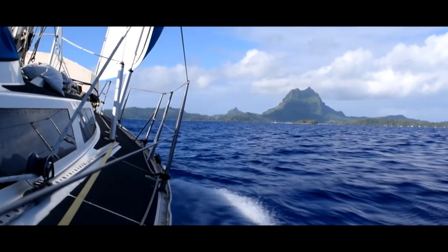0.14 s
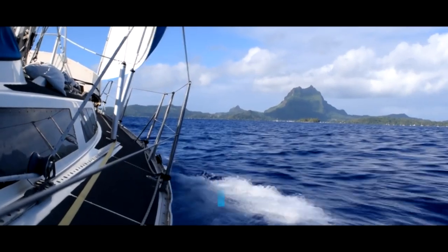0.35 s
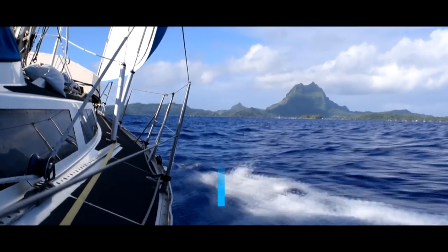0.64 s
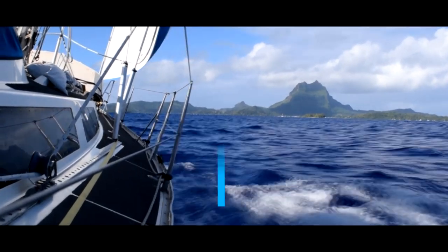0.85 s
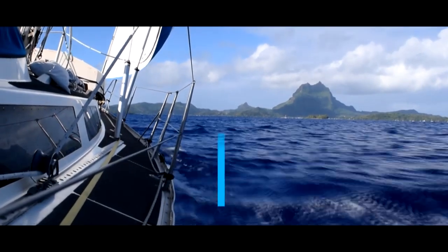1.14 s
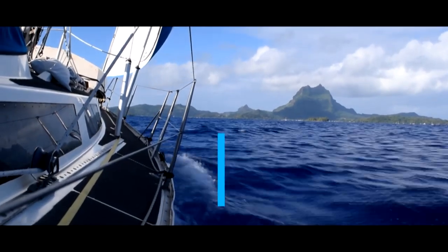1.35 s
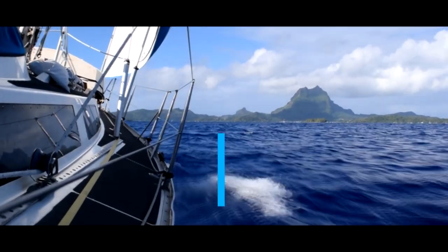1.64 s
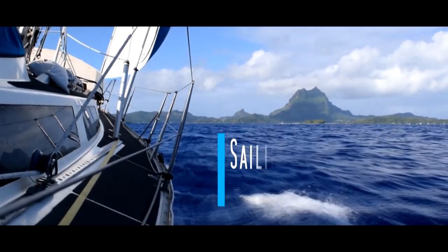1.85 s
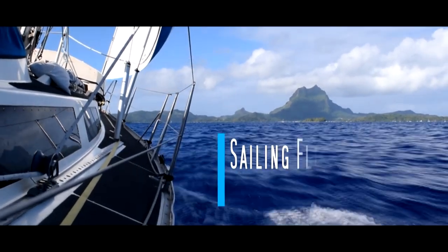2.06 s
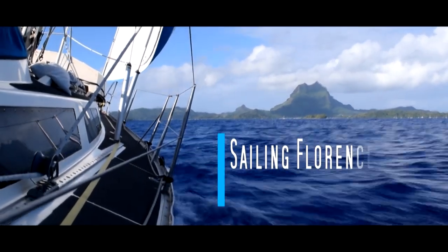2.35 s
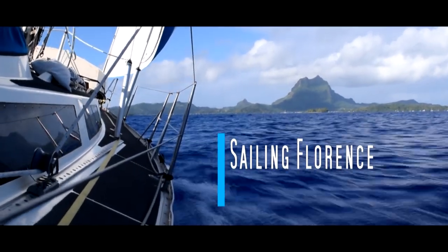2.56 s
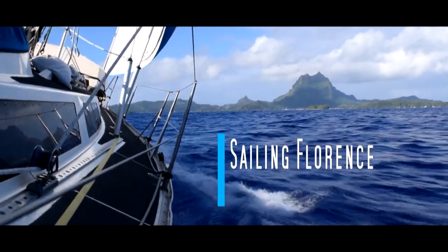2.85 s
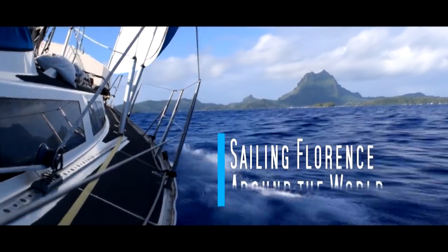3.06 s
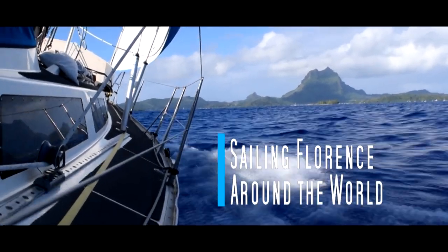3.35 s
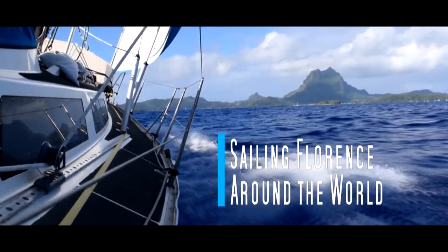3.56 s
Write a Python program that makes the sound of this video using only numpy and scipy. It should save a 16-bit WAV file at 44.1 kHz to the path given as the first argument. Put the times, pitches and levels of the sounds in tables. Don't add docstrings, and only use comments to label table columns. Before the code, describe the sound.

Bow waves break one after another beside a moving sailboat, foaming, hissing and bubbling over steady wake

```python
import sys
import numpy as np
from scipy import signal
from scipy.fft import rfft, irfft, next_fast_len
from scipy.io import wavfile
from scipy.ndimage import uniform_filter1d, map_coordinates

SR = 44100
rng = np.random.default_rng(int(sys.argv[2]) if len(sys.argv) > 2 else 0)


def gain_from_db(level_db):
    decades = np.asarray(level_db, float) / 20
    return 10 ** decades


def transcribe(signal):
    frames = np.atleast_2d(signal).T
    limited = np.clip(frames, -1, 1)
    pcm = np.round(limited * 32767).astype(np.int16)
    wavfile.write(sys.argv[1], SR, pcm)


N = 163170

# (time [s], level [dB])
WAVE_STRENGTH = [(0, -21.5), (.14, -16), (.36, -20), (.5, -23.5), (.7, -27), (.9, -29.5), (1.0, -35),
                 (1.3, -37), (1.38, -33), (1.5, -27), (1.68, -22), (1.8, -25.5), (1.95, -22.5),
                 (2.42, -25.5), (2.62, -30), (3.12, -30), (3.3, -28), (3.7, -24.5)]
# (frequency [Hz], density [dB per Hz])
CHURN_SPECTRUM = [(24, -73), (40, -56), (129, -10), (264, -5.5), (420, -0.5), (560, -2), (850, -3.5),
                  (1570, -5.5), (2060, -2.5), (6000, -34), (7800, -50), (13200, -120)]
# (time [s], level [dB])
SPRAY_THROWN = [(0.0, -40.5), (0.14, -30.5), (0.17, -33.5), (0.69, -44), (0.74, -41), (0.97, -52.5),
                (0.99, -52), (1.03, -54), (1.5, -49.5), (1.72, -44), (1.8, -49), (1.87, -44.5), (2.2, -45),
                (2.7, -53.5), (2.71, -51), (2.75, -50.5), (3.06, -51.5), (3.7, -46)]
# (frequency [Hz], density [dB per Hz])
SPRAY_SPECTRUM = [(1500, -15), (2800, 0), (4060, -2.5), (4930, -9), (6500, -10.5), (9130, -14),
                  (16200, -29.5)]
# (frequency [Hz], density [dB per Hz])
WAKE_SPECTRUM = [(20, -50), (60, -32), (150, -9), (350, -6.5), (700, -8.5), (3000, -4), (5000, -24),
                 (16200, -51)]
# (time [s], peak [dB], pitch [Hz], life [s])
POPS = [(1.965, -15, 2080, .009), (1.097, -27, 1000, .014), (3.14, -26, 1400, .016),
        (.893, -27, 1000, .014), (.578, -22, 820, .03), (.553, -22, 600, .022),
        (.712, -28, 820, .025), (.944, -19, 260, .007), (.93, -32, 130, .012),
        (.912, -24, 280, .007), (1.044, -28, 170, .012), (.002, -22, 4150, .007),
        (.028, -16, 380, .02), (.047, -16, 450, .012), (.066, -16, 680, .01), (.086, -15, 640, .016),
        (.092, -17, 2050, .01), (.128, -13, 680, .012), (.144, -11, 1150, .01),
        (.157, -14, 1300, .008), (.21, -13, 500, .014), (.31, -17, 1600, .008),
        (.34, -21, 2020, .01), (.963, -31, 200, .01), (1.0, -31, 150, .014), (1.173, -30, 345, .016),
        (1.201, -36, 684, .012), (1.218, -30, 1760, .01), (1.41, -29, 400, .014),
        (1.395, -28, 950, .02), (1.457, -24, 783, .014), (1.614, -20, 805, .016),
        (1.66, -21, 657, .016), (1.825, -22, 544, .016), (1.935, -22, 500, .016),
        (2.13, -24, 2100, .012), (2.728, -26, 2600, .006), (3.005, -29, 1100, .014),
        (3.325, -25, 850, .014), (3.315, -28, 1970, .014), (3.655, -26, 2200, .016)]
# (time [s], level [dB], decay by 60 dB [s], centre [Hz])
SPLASHES = [(.988, -26, .14, 2800), (.989, -39, .08, 4300), (.885, -35, .15, 2400), (2.716, -25, .25, 2200),
            (.005, -27, .05, 4200), (.115, -23, .5, 1250), (.305, -24, .5, 480), (.135, -24, .35, 2300),
            (.35, -27, .4, 480), (1.96, -30, .5, 2200), (.56, -33, .5, 2600), (1.875, -27, .2, 750),
            (2.005, -27, .3, 650), (2.325, -28, .15, 500), (2.94, -33, .3, 800), (3.29, -31, .3, 800),
            (3.63, -28, .5, 900), (.092, -24, .3, 2200), (.18, -21, .5, 800), (.43, -30, .2, 1700),
            (.482, -31, .15, 1900), (1.2, -39, .2, 700), (1.345, -36, .3, 950), (1.447, -34, .2, 2200),
            (1.56, -32, .3, 2050), (2.4, -32, .15, 1940), (2.8, -34, .2, 1100), (3.12, -35, .2, 2100),
            (3.22, -33, .2, 800), (3.43, -32, .4, 820), (3.54, -32, .3, 1800), (3.635, -31, .3, 2100)]
# (share of centre [ratio], density [dB per Hz])
SPLASH_SPECTRUM = [(.2, -35), (.55, 0.5), (1, 14), (1.6, -15), (3, -25), (5, -43)]
# (time [s], length [s], level [dB], depth of the low push [dB])
GUSTS = [(0.018, .05, -38, -1), (0.128, 0.052, -37, 0), (0.303, 0.3, -60, 15), (0.545, 0.039, -34.5, -3),
         (0.71, 0.21, -50.5, 10), (0.93, 0.085, -36, 1), (1.05, 0.05, -42, 9), (1.585, 0.23, -35, -16),
         (1.812, 0.039, -41, -12), (2.04, 0.17, -39.5, -11), (3.53, .12, -42.5, 8.5), (.42, .08, -51, 8),
         (1.16, .1, -61, 6), (2.903, 0.11, -56, 4), (3.2, .12, -60, 7)]
# (frequency [Hz], density [dB per Hz])
BUFFET_SPECTRUM = [(40, -42), (110, -5), (200, 4), (320, -9), (600, -36), (1200, -80)]
# (frequency [Hz], density [dB per Hz])
PUSH_SPECTRUM = [(15, -30), (40, -14), (90, 4), (140, -6), (300, -40)]
# (frequency [Hz], level [dB], decay by 60 dB [s])
FITTING_MODES = [(1000, -9, .015), (1980, -2, .022), (2550, -15, .04), (3400, -13, .012), (5250, -19, .016),
                 (7750, -21, .016)]
# (frequency [Hz], width [Hz], boost [dB])
HOUSING_RESONANCES = [(852, 97, 3), (1990, 680, -1), (278, 49, -4), (3100, 200, 0.5), (630, 25, 1.5)]


def unit(x):
    return x / np.sqrt(np.mean(x ** 2) + 1e-20)


def wobble(rate):
    knots = rng.standard_normal(int(N * rate / SR) + 4)
    return map_coordinates(knots, [np.arange(N) * rate / SR])


def filtered(x, response):
    size = next_fast_len(len(x) + 8192)
    spectrum = rfft(x, size) * response(np.fft.rfftfreq(size, 1 / SR))
    return irfft(spectrum, size)[:len(x)]


def coloured(x, points):
    f, db = np.transpose(points)

    def response(hz):
        return gain_from_db(np.interp(np.log(hz + 1), np.log(f + 1), db, left=-120, right=-120))

    return unit(filtered(x, response))


def patchy(depth_db):
    z = signal.stft(rng.standard_normal(N), nperseg=512)[2]
    field = uniform_filter1d(rng.standard_normal(z.shape), size=7, axis=0)
    field = uniform_filter1d(field, size=10, axis=1)
    return unit(signal.istft(z * gain_from_db(depth_db * unit(field)), nperseg=512)[1][:N])


def grains(count, hz, spread, cycles, size_db, rise, size):
    u, t = rng.random((count, 2)), np.arange(size) / SR
    f = np.clip(hz * np.exp(spread * rng.standard_normal((count, 1))), 150, 15000)
    gain = gain_from_db(-size_db * np.log(u[:, 1:] + 0.003)) * f / hz
    age = t * f / cycles
    wave = gain * np.sin(2 * np.pi * f * t * (1 + rise * age)) * age * np.exp(-3 * age)
    at = (u[:, :1] * N).astype(int) + np.arange(size)
    return unit(np.bincount(at.ravel(), wave.ravel(), N + size)[:N])


def level_curve(table):
    return np.interp(np.arange(N) / SR, *np.transpose(table))


def churn():
    bubbles = grains(count=4100, hz=801.0, spread=.7, cycles=14.3, size_db=1.9, rise=0.033, size=1200)
    mixture = patchy(0.3) + gain_from_db(-11) * bubbles
    return gain_from_db(level_curve(WAVE_STRENGTH)) * coloured(mixture, CHURN_SPECTRUM)


def spray():
    fizz = grains(count=9000, hz=5470, spread=0.395, cycles=23, size_db=4.0, rise=0.022, size=300)
    hiss = coloured(patchy(0.71) + gain_from_db(-11) * fizz, SPRAY_SPECTRUM)
    return gain_from_db(level_curve(SPRAY_THROWN) + 4.5 + 0.26 * wobble(12)) * hiss


def wake():
    return gain_from_db(-38.5 + 1.3 * wobble(3.47)) * coloured(patchy(2.5), WAKE_SPECTRUM)


def water():
    surge_db = 0.35 * wobble(14) + 0.48 * wobble(35.43)
    return gain_from_db(surge_db) * (churn() + spray()) + wake()


def pops():
    out, t = np.zeros(N + SR), np.arange(SR // 4) / SR
    for s, db, hz, life in POPS:
        age = t / life
        ring = np.sin(2 * np.pi * hz * t * (1 + 0.021 * age))
        out[round(s * SR):][:len(t)] += gain_from_db(db) * 8 * age * np.exp(-3 * age) * ring
    return out[:N]


def splashes():
    out, t = np.zeros(N + SR), np.arange(SR // 4) / SR
    for s, db, t60, hz in SPLASHES:
        noise = gain_from_db(1.5 * wobble(170)[:len(t)]) * rng.standard_normal(len(t))
        patter = coloured(noise, np.multiply(SPLASH_SPECTRUM, (hz, 1)))
        onset = 1 - np.exp(-t / 0.0014)
        out[round(s * SR):][:len(t)] += gain_from_db(db - 60 * t / t60) * onset * patter
    return out[:N]


def lumpy_pressure(spectrum):
    return coloured(gain_from_db(0.67 * wobble(60)) * rng.standard_normal(N), spectrum)


def wind():
    t, out = np.arange(N) / SR, np.zeros(N)
    buffet, push = lumpy_pressure(BUFFET_SPECTRUM), lumpy_pressure(PUSH_SPECTRUM)
    for s, length, db, deep_db in GUSTS:
        swell = np.exp(-(2.0 * (t - s) / length) ** 2)
        out += gain_from_db(db) * swell * (buffet + gain_from_db(-10.5 + deep_db) * push)
    return out


def fitting_tick():
    out, t = np.zeros(N + SR), np.arange(SR // 4) / SR
    ring = sum(gain_from_db(db - 60 * t / t60) * np.sin(2 * np.pi * hz * t) for hz, db, t60 in FITTING_MODES)
    onset = 1 - np.exp(-t / .0006)
    out[round(2.7127 * SR):][:len(t)] += gain_from_db(-12) * ring * onset
    return out[:N]


def scene():
    return (water() + pops() + splashes() + wind() + fitting_tick())[None]


def housing(f):
    boost_db = sum(db / (1 + (2 * (f - hz) / width) ** 2) for hz, width, db in HOUSING_RESONANCES)
    bass_cut = f / np.hypot(f, 58)
    return gain_from_db(boost_db) * bass_cut


def roll_off(x):
    return signal.sosfilt(signal.butter(12, 15740, fs=SR, output="sos"), x)


def record(dry):
    ceiling = .62
    rounded = dry[0] / (1 + (dry[0] / ceiling) ** 4) ** (1 / 4)
    return roll_off(filtered(rounded, housing)[None])


dry = scene()
out = record(dry)
transcribe(out)
```